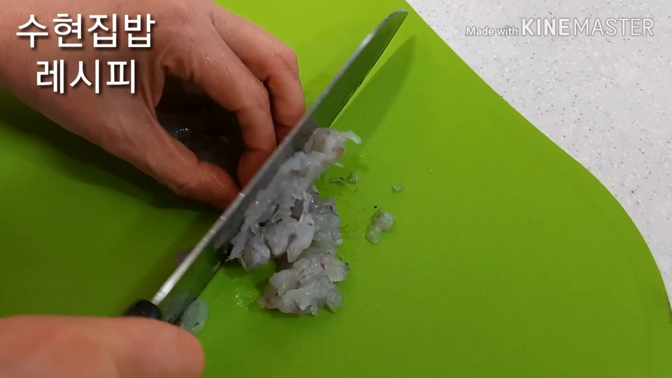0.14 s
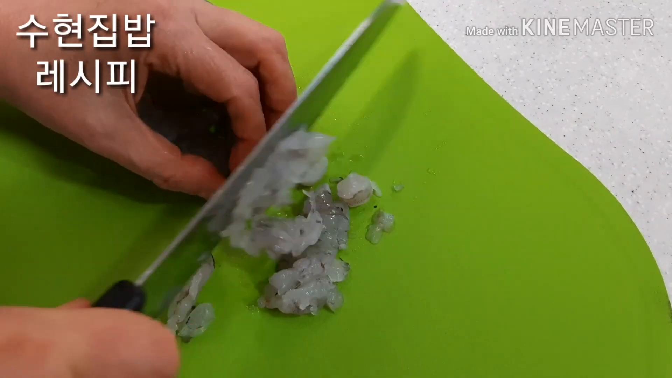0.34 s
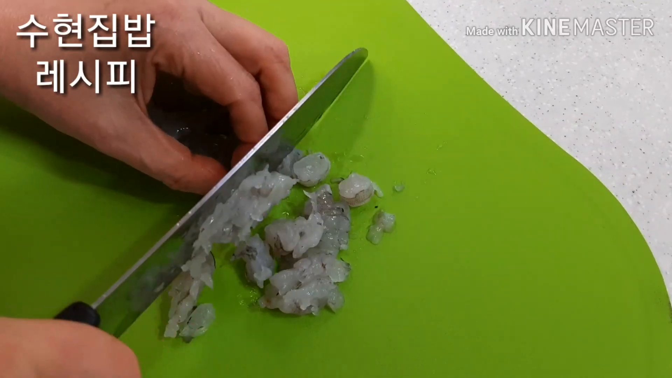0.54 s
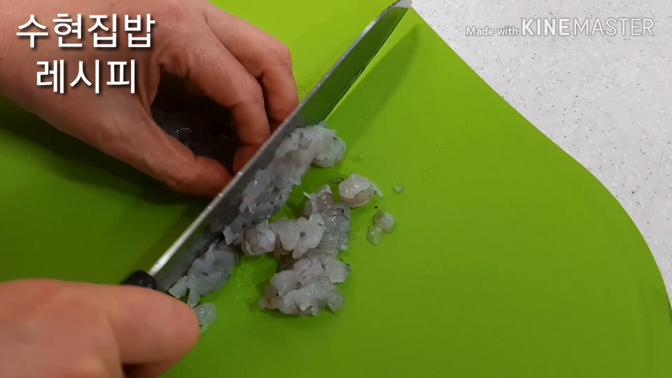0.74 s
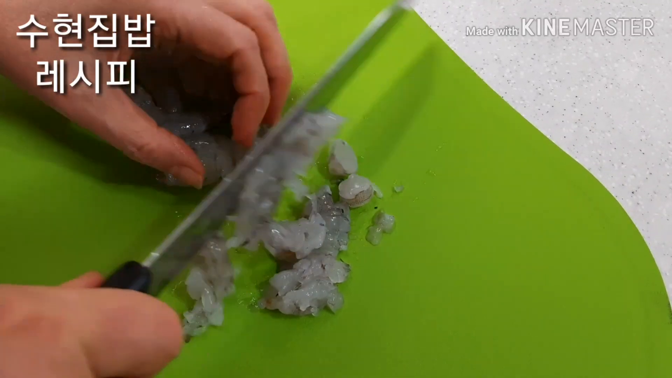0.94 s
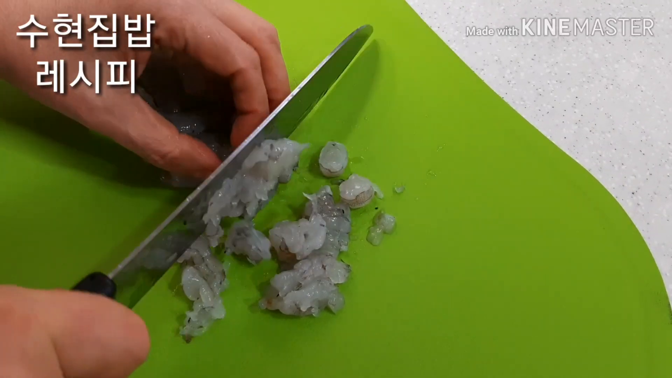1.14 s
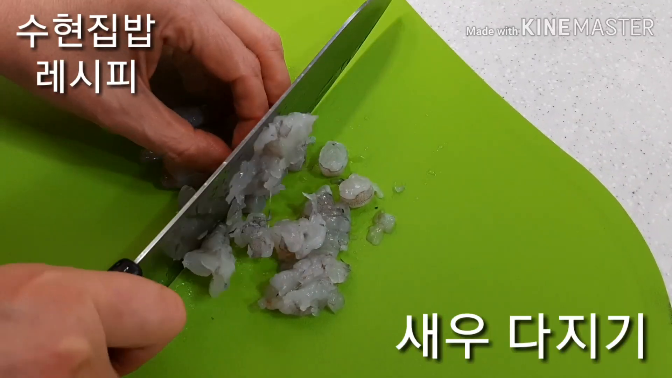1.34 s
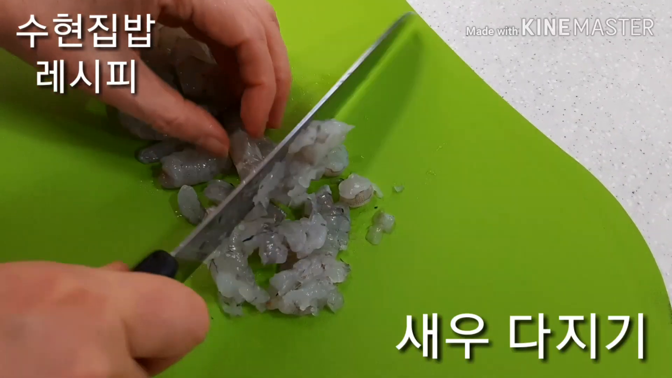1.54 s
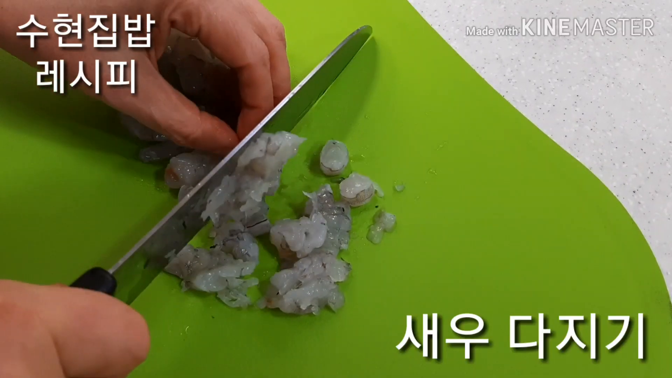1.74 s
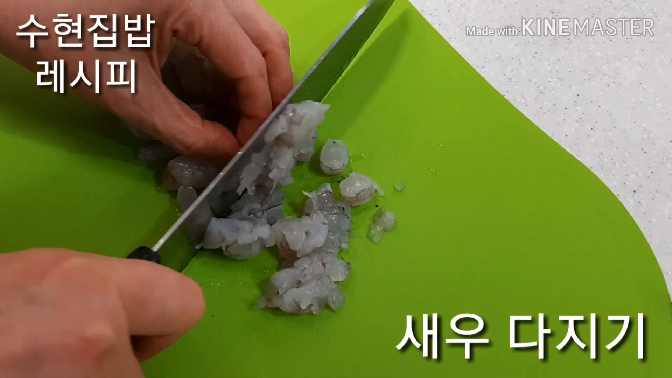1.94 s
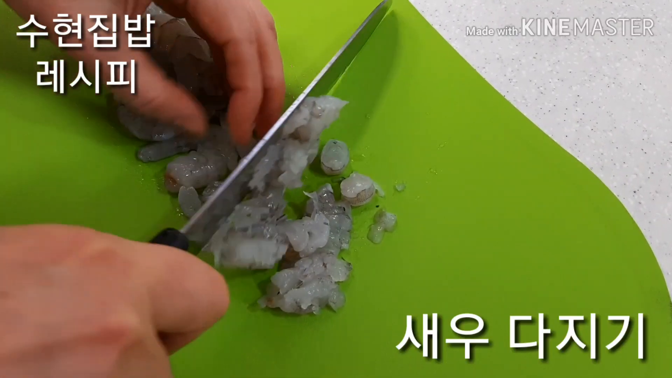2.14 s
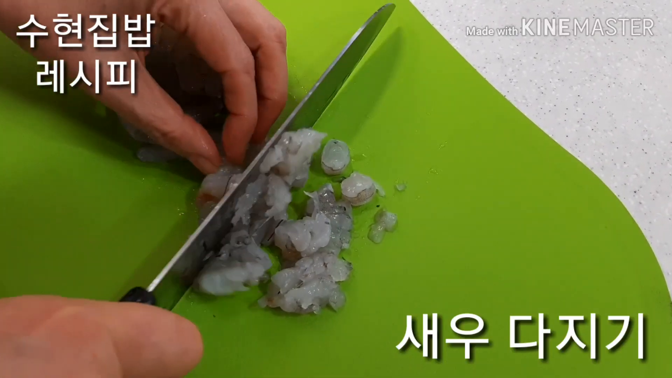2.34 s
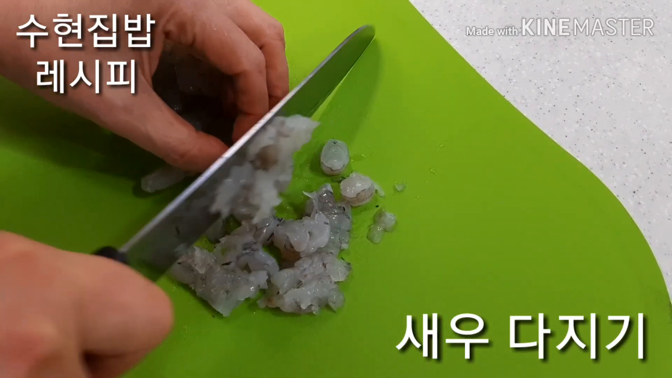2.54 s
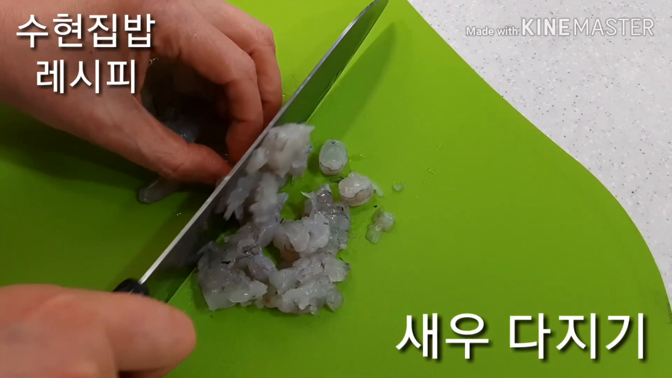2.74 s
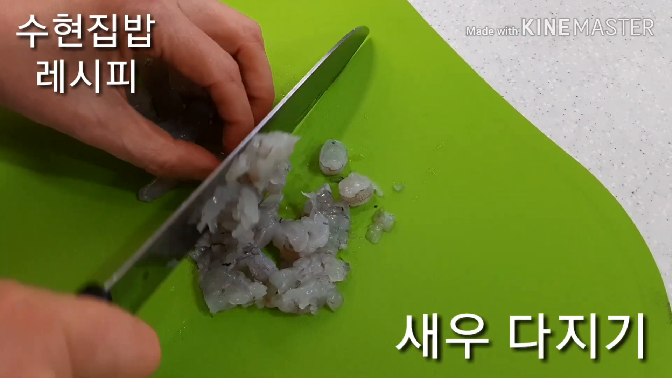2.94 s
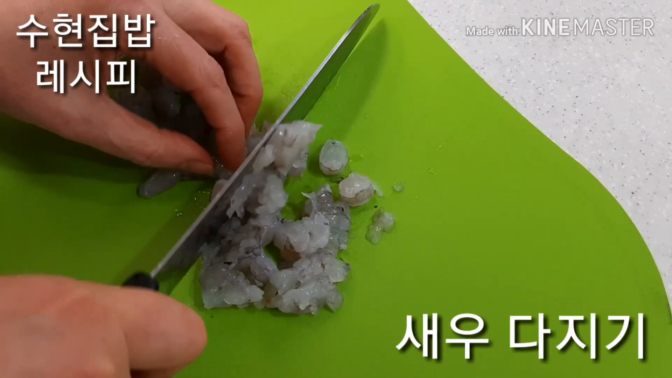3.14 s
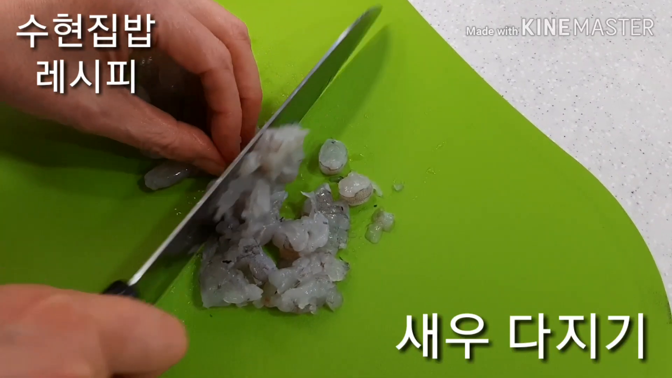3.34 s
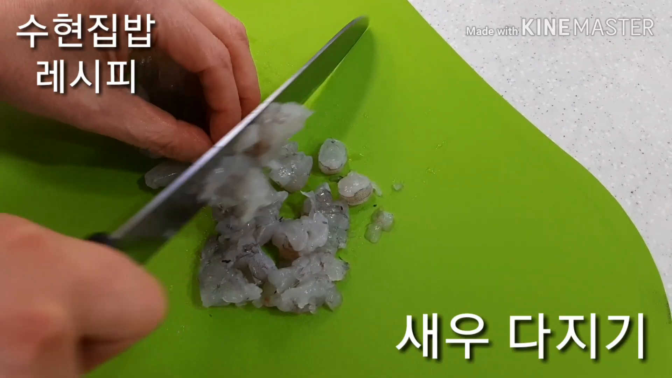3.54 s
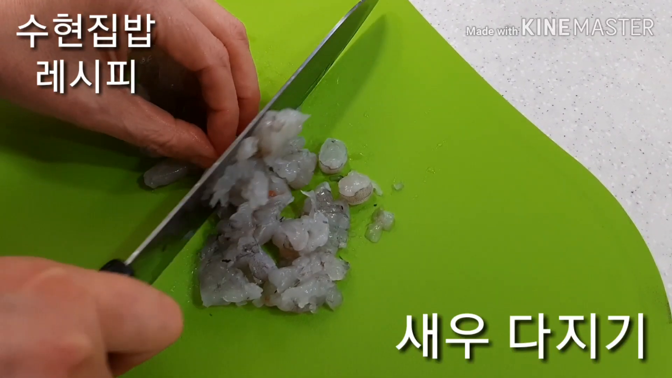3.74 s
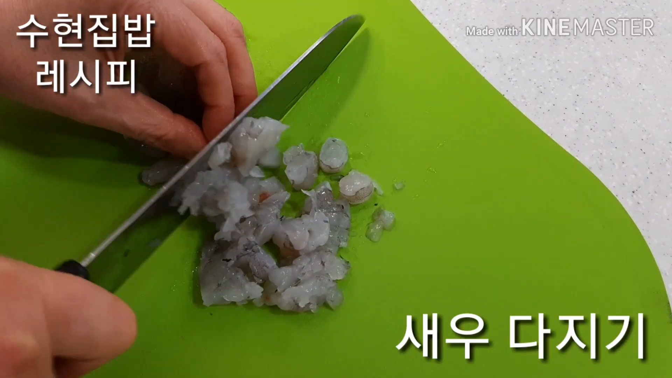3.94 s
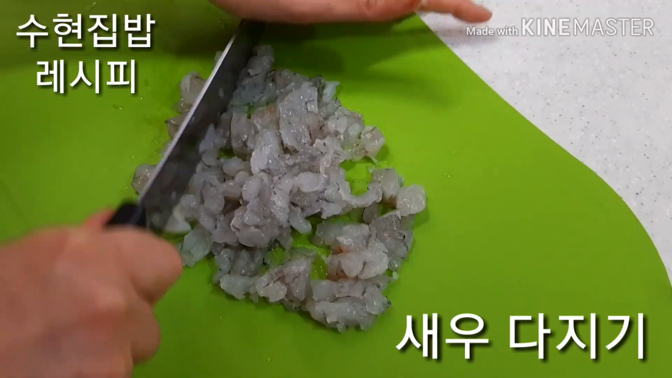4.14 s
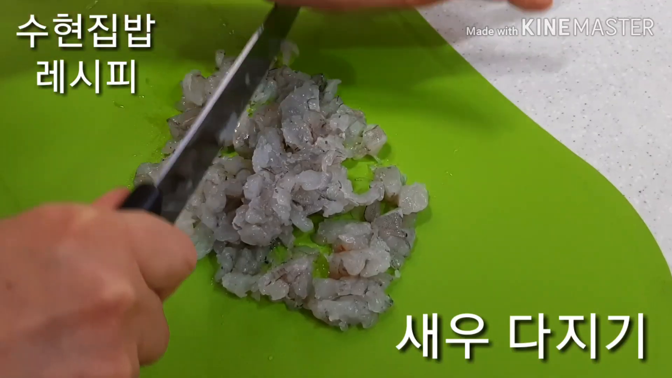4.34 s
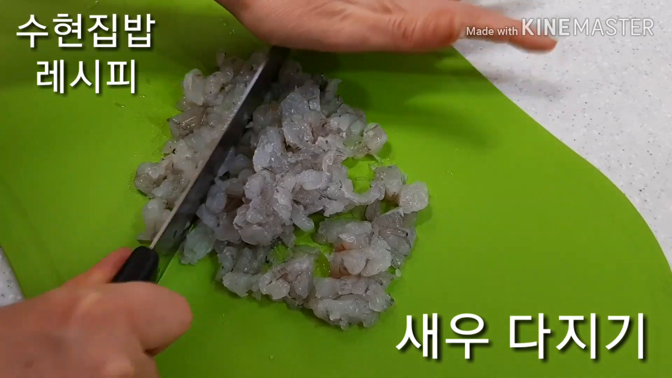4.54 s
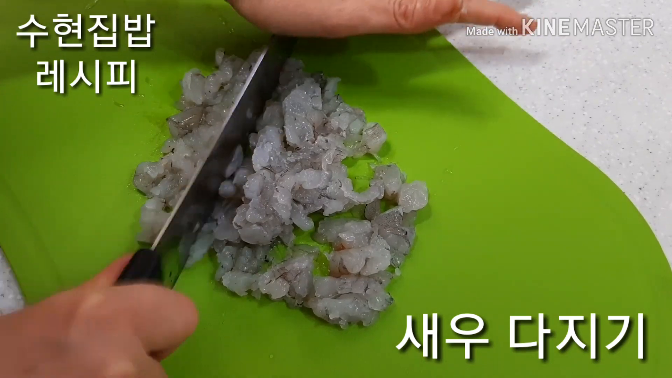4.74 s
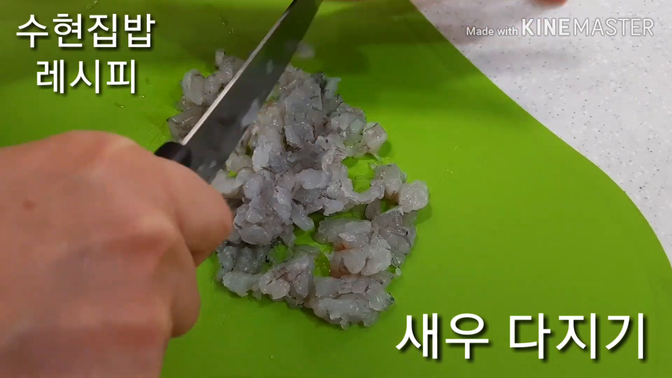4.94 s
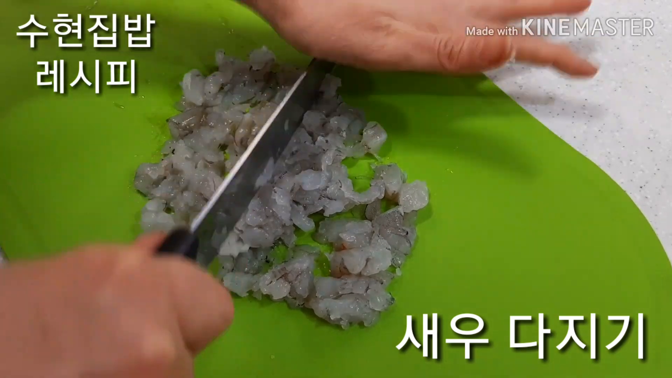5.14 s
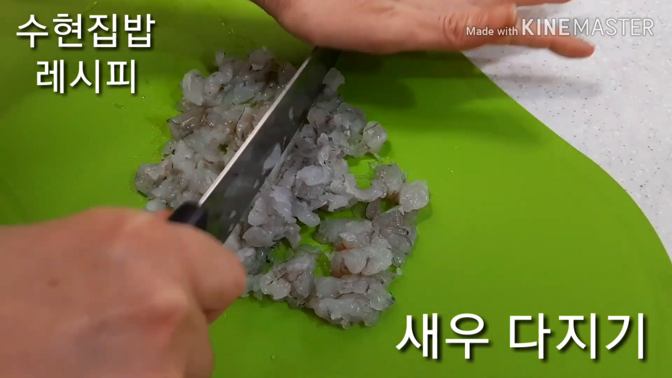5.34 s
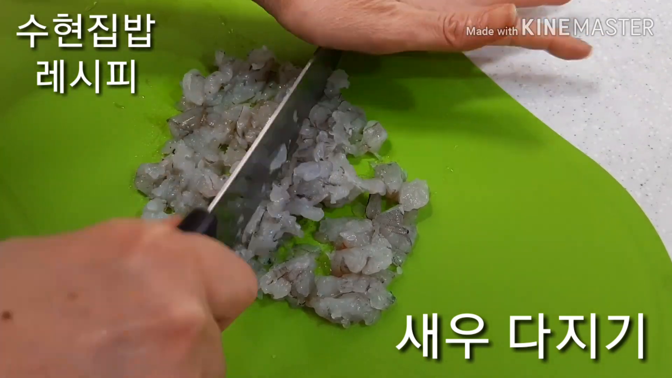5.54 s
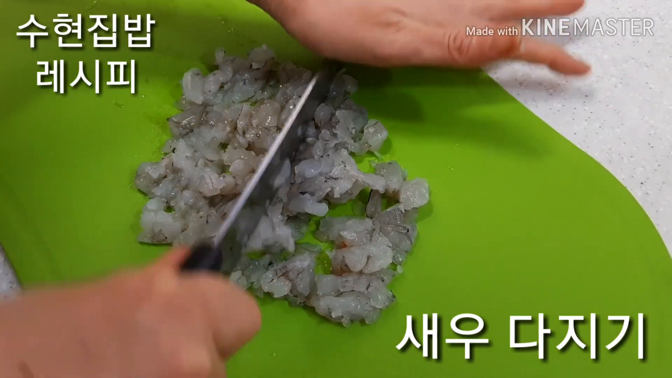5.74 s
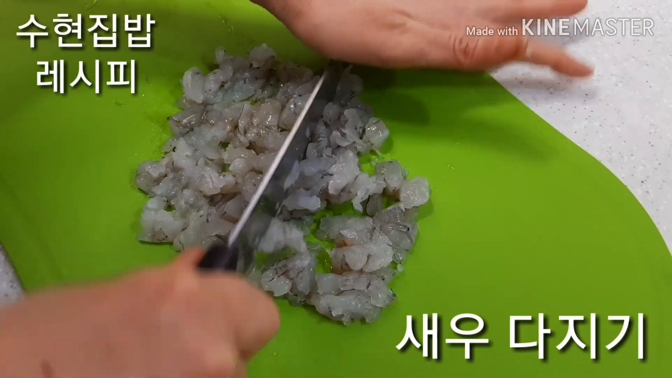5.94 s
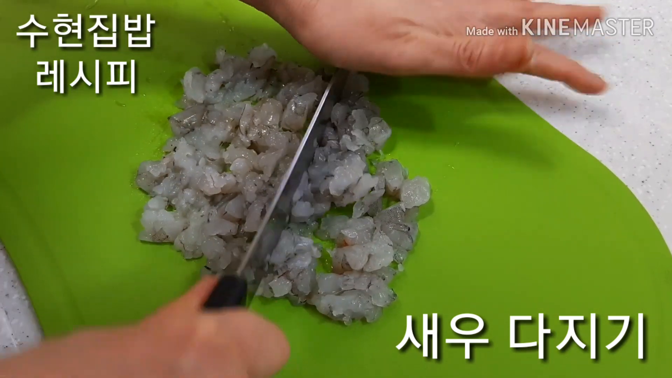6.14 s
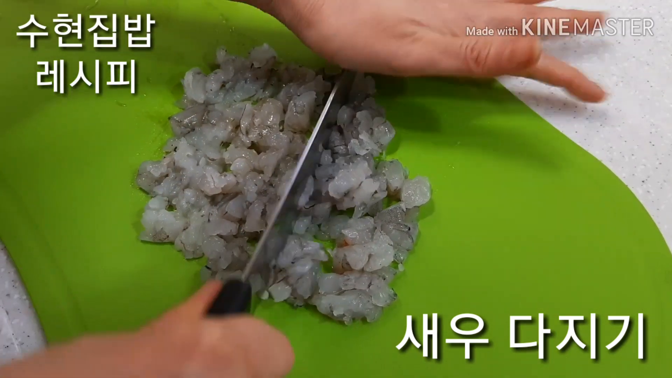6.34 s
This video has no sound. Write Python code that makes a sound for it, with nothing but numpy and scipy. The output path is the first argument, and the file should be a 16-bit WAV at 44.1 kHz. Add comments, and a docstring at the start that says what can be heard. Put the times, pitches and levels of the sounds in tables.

```python
"""A chef's knife minces raw shrimp on a thin plastic board on a counter, close by in a small hard kitchen.
First come ten slow slices: the flesh tears in dense wet crackle and snaps, the edge knocks and grinds
on the board, fingers shuffle the pile, films peel off the rising blade, with squelches and faint squeaks.
From about 4.5 s the strokes turn to quick rocking chops, and board and counter thud harder under
the heel of the knife. A low rumble and hiss lie under it all."""
import sys
import numpy as np
from scipy import signal
from scipy.fft import rfft, irfft
from scipy.io import wavfile
from scipy.ndimage import uniform_filter1d

SR = 44100
rng = np.random.default_rng(int(sys.argv[2]) if len(sys.argv) > 2 else 0)


def unload_audio(sound):
    """Save the sound as a 16-bit wav file, at the path given as the first command line argument."""
    columns = np.transpose(np.atleast_2d(sound))
    # keep every value between -1 and 1, then stretch to whole-number steps
    steps = np.round(np.clip(columns, -1, 1) * 32767)
    wavfile.write(sys.argv[1], SR, steps.astype(np.int16))


N = 281358
TIME = np.arange(N) / SR


def amp(db):
    """Decibels to gain."""
    return 10 ** (np.asarray(db) / 20)


def on_log(points, hz):
    """Read (Hz, value) points along a log-frequency axis."""
    f, value = np.transpose(points)
    return np.interp(np.log(hz + 1e-3), np.log(f), value)


def bins(x):
    """Bin frequencies of x in Hz."""
    return np.arange(x.shape[-1] // 2 + 1) * SR / x.shape[-1]


def unit(x):
    """Scale to unit mean energy per channel."""
    return x / np.sqrt(np.mean(np.sum(x ** 2, axis=-1)))


def ring(x, response):
    """Convolve with an impulse response."""
    return signal.oaconvolve(np.atleast_2d(x), np.atleast_2d(response), axes=-1)[:, :N]


def colour(points, size=4096):
    """Minimum-phase impulse response from (Hz, dB) points."""
    cepstrum = irfft(np.log(amp(on_log(points, bins(np.zeros(size))))))
    cepstrum[1:size // 2] *= 2
    cepstrum[size // 2 + 1:] = 0
    return unit(irfft(np.exp(rfft(cepstrum))))


def lowpass(x, hz, order=2):
    """Butterworth low-pass."""
    return signal.sosfilt(signal.butter(order, min(hz, SR / 2 - 1000), fs=SR, output="sos"), x)


def add(out, start_s, sound):
    """Mix a sound in at start_s."""
    i = max(int(start_s * SR), 0)
    out[..., i:i + sound.shape[-1]] += sound[..., :max(N - i, 0)]


def pan(x, right_db):
    """Favour the right channel."""
    return x * amp(np.array([[-right_db], [right_db]]) / 2)


# Diffuse sound at the two microphone ports. Each row: frequency in Hz, correlation.
PORT_CORRELATION = [(100, 0.91), (250, 0.99), (500, 0.69), (900, 0.43), (2000, -0.3), (16000, -0.096)]


def diffuse(size):
    """White noise at two ports: alike in the bass, nearly unrelated in the treble."""
    noise = rng.standard_normal((2, size))
    mid, side = rfft(noise)
    correlation = np.clip(on_log(PORT_CORRELATION, bins(noise)), -.99, .99)
    shared = mid * np.sqrt((1 + correlation) / 2)
    opposed = side * np.sqrt((1 - correlation) / 2)
    return irfft(np.array([shared + opposed, shared - opposed]), size)


def scatter(x, scatter_db, t60_s, lag_ms):
    """Direct path to both ports, plus quick random echoes off counter, blade and hands."""
    t = TIME[:SR // 12]
    response = amp(scatter_db) * unit(diffuse(len(t)) * 1000 ** (-t / t60_s))
    lag = int(lag_ms * SR / 1000 * rng.uniform(-1, 1))
    response[0, max(lag, 0)] += 1
    response[1, max(-lag, 0)] += 1
    return ring(x, unit(response))


# Each row: frequency in Hz, reverberation T60 in seconds.
KITCHEN_DECAY = [(120, 0.39), (400, 0.33), (1500, 0.36), (5000, 0.35), (9000, 0.24), (15000, 0.24)]


def kitchen(x, wet_db):
    """Add the room's tail, each band dying at its own rate."""
    t = TIME[:SR // 2]
    noise, centres_hz = diffuse(len(t)), np.geomspace(60, 18000, num=12)
    spectrum, tail = rfft(noise), np.zeros_like(noise)
    for hz, weights in zip(centres_hz, np.eye(len(centres_hz))):
        band = on_log(list(zip(centres_hz, weights)), bins(noise))
        tail += irfft(spectrum * band, len(t)) * 1000 ** (-t / on_log(KITCHEN_DECAY, hz))
    onset = np.minimum(t / 0.0032, 1)
    return x + amp(wet_db) * ring(x, unit(tail * onset))


# Each row: frequency in Hz, relative noise density in dB.
ROOM_SPECTRUM = [(15, -31), (25, -34), (70, -6.5), (190, 0.5), (309, -4.5), (344, -4.5), (545, -19.5),
                 (818, -20.5), (988, -15.5), (1130, -23), (1520, -24.5), (2690, -28.5), (10100, -32),
                 (14800, -30.5), (16000, -49)]


def room_tone(level_db=-67.5):
    """Low, steady rumble under a smooth hiss."""
    return amp(level_db) * ring(diffuse(N), colour(ROOM_SPECTRUM))


EASE_S, EASE_DB = 0.022, 30.5


def contact(length_s, db, swell_db, t60_s):
    """Gain of one contact: easing in for EASE_S before it bites, a steady swell or fade, a release."""
    t = TIME[:int(min(EASE_S + length_s + t60_s, .4) * SR)] - EASE_S
    ramp_db = swell_db * (np.clip(t / length_s, 0, 1) - .5)
    onset_db = EASE_DB * np.minimum(t / EASE_S, 0)
    release = 1000 ** (-np.maximum(t - length_s, 0) / t60_s)
    return amp(db + ramp_db + onset_db) * release


def grains(gain, per_s, spread_db, clump_db, clump_hz):
    """Tiny random ruptures of uneven size, coming in clumps under a gain curve."""
    n = len(gain)
    chance, size, sign, clump = rng.random((4, SR // 2))[:, :n]
    strength = amp(-spread_db * np.log(size + 0.062))
    clumping = amp(clump_db * np.interp(TIME[:n] * clump_hz, np.arange(n), 2 * clump - 1))
    clicks = (chance < per_s / SR) * np.sign(sign - .5) * strength * clumping
    local_power = np.abs(uniform_filter1d(clicks ** 2, size=1100))
    return gain * clicks / np.sqrt(local_power + 1e-3)


def spray(clicks, spray_db, t60_s):
    """Each rupture throws a short burst of finer crackle, different at the two ports."""
    decay = unit(1000 ** (-TIME[:SR // 20] / t60_s))
    power = ring(clicks ** 2, decay ** 2)
    bursts = np.sqrt(np.abs(power)) * rng.standard_normal((2, SR // 2))[:, :power.shape[1]]
    out = amp(spray_db) * bursts
    add(out, 0, clicks)
    return out / np.hypot(1, amp(spray_db))


# Each row: frequency in Hz, relative level in dB, T60 in seconds, signed gain at the microphone.
BOARD_MODES = [(92.2, -3.5, 0.059, -0.66), (150.3, 1.5, 0.25, 1), (197, -6.5, 0.09, 0.63),
               (200.1, -4, 0.14, 1), (276.3, -3, 0.13, -1.32), (345.2, -7.5, 0.19, 0.27),
               (357.2, 4.5, 0.3, -0.35), (396, -9.5, 0.23, 0.96), (455.6, -8, 0.59, 0.36),
               (572, 2, 0.15, -0.87), (645, -28, 0.14, -0.044), (703, -19.5, 0.72, -0.7),
               (910, -19.5, 0.46, 0.45), (1015, -4, 0.16, -0.95), (1445, -17, 0.1, 1),
               (1500, -30, 0.15, -1.1), (1600, -16, 0.11, 0.77), (2064, -3.5, 0.041, -1.9)]


def board():
    """Board and counter answer a tap with decaying modes."""
    t = TIME[:SR // 3]
    return sum(gain * amp(db) * np.sin(2 * np.pi * hz * t) * 1000 ** (-t / t60_s)
               for hz, db, t60_s, gain in BOARD_MODES)


def light_touch(spectrum, modes_db, highpass_hz):
    """Response to a contact with no weight behind it: a broad knock plus the board's upper modes."""
    upper_modes = signal.sosfilt(signal.butter(3, highpass_hz, "high", fs=SR, output="sos"), board())
    response = amp(modes_db) * unit(upper_modes)
    add(response, 0, colour(spectrum))
    return unit(response)


# Each row: frequency in Hz, relative density in dB.
CRACKLE_SPECTRUM = [(500, -18.5), (1500, -22), (3000, -7.5), (5000, -5), (7200, -5), (8500, 3.5),
                    (10000, -1), (12500, 3), (15000, -4.5), (16500, -7.5)]
GRIND_SPECTRUM = [(70, -15.5), (120, -5), (165, -11.5), (210, 12.5), (280, -20.5), (360, 8), (500, -3),
                  (650, 0.5), (900, -6.5), (1500, -14), (3000, -14.5), (6000, -17.5), (16000, -27)]
# Downstrokes through the flesh. Each row: start and length in seconds, then crackle level,
# swell over the stroke, grind level and later rubbing level in relative dB.
STROKES = [ (0.045, 0.094, -53.5, 9, -47.5, -72), (0.662, 0.097, -56, 15.5, -49, -66),
           (1.316, 0.083, -58.5, -1.5, -49, -56.5), (1.923, 0.071, -56, -5, -47.5, -68),
           (2.356, 0.036, -65, 6, -62, -64), (2.704, 0.094, -58.5, -2.5, -50.5, -60.5),
           (3.045, 0.065, -65.5, -2, -59, -64.5), (3.38, 0.05, -53.5, 1, -41.5, -59),
           (3.694, 0.068, -57, -9.5, -44.5, -64), (4.034, 0.08, -58, -11, -48, -69.5),
           (4.551, 0.021, -50, 10, -40.5, -63), (4.803, 0.013, -46, 12.5, -42, -81),
           (5.252, 0.021, -45.5, -0.5, -40.5, -74), (5.474, 0.021, -50, 13, -47, -78),
           (5.695, 0.021, -44.5, 5.5, -44, -68), (5.904, .026, -48, 6.5, -40.5, -60),
           (6.113, 0.017, -46, 14, -42, -67), (6.323, 0.016, -50, 9.5, -45, -70)]


def cutting():
    """Fibres tear under the edge: bright crackle in the air, dull grinding through the board."""
    crackle, grind = np.zeros((2, 2, N))
    for start_s, length_s, crackle_db, swell_db, grind_db, _ in STROKES:
        grind_swell_db = 0.89 * swell_db + 7.5  # grows as the edge nears the board
        tear_gain = contact(length_s, crackle_db, swell_db, t60_s=0.018)
        drag_gain = contact(length_s, grind_db, grind_swell_db, t60_s=0.038)
        tearing = grains(tear_gain, per_s=2500, spread_db=4, clump_db=7, clump_hz=160)
        dragging = grains(drag_gain, per_s=1300, spread_db=5, clump_db=7.5, clump_hz=134.4)
        add(crackle, start_s - EASE_S, spray(tearing, spray_db=11.5, t60_s=0.0084))
        add(grind, start_s - EASE_S, scatter(dragging, scatter_db=-1.5, t60_s=0.052, lag_ms=0.41))
    crackle = ring(crackle, colour(CRACKLE_SPECTRUM))
    grind = ring(grind, light_touch(GRIND_SPECTRUM, modes_db=-14.5, highpass_hz=470))
    return amp(3.5) * kitchen(crackle, wet_db=-9), amp(-1.5) * kitchen(grind, wet_db=-8)


def settling(window_s=0.087, db=-47, spread_db=3, hz=10500, spread_hz=2500):
    """The flesh settles after each stroke: one faint random snap each, as rows like WET_SNAPS."""
    rows = []
    for start_s, length_s, *_ in STROKES:
        when, size, pitch = rng.random(3)
        snap_s = start_s + length_s + window_s * when
        rows.append((snap_s, db + spread_db * (2 * size - 1), hz + spread_hz * (2 * pitch - 1)))
    return rows


# Each row: frequency in Hz, relative density in dB.
SNAP_SPECTRUM = [(400, -4), (2000, -13), (4000, -13.5), (7000, -5), (8600, 0), (12500, 1), (16000, -3)]
# Each row: start in seconds, relative level in dB, ping pitch in Hz.
WET_SNAPS = [(0.043, -34, 8600), (0.0707, -27.5, 9500), (0.131, -30, 14100), (0.737, -32, 8440),
             (0.8794, -55, 8700), (0.9171, -34, 4180), (0.965, -44, 8470), (1.3125, -34.5, 8400),
             (1.4024, -32, 8700), (1.553, -32.5, 8000), (2.0897, -35.5, 11600), (2.198, -49, 9100),
             (2.4982, -43.5, 13500), (2.7006, -26, 8600), (2.7546, -38, 8600), (2.832, -37.5, 15000),
             (3.0356, -37, 8500), (3.1656, -50, 10300), (3.3737, -26.5, 8360), (3.4906, -41, 4970),
             (3.8013, -40.5, 9300), (4.011, -42.5, 9400), (4.55, -33.5, 9770), (4.569, -35, 11300),
             (4.661, -46, 12600), (4.9563, -43.5, 8340), (5.218, -38, 9000), (5.238, -25.5, 8640),
             (5.3282, -33, 10500), (5.5463, -31, 13200), (5.698, -32, 14500), (5.771, -30, 13100),
             (5.877, -42.5, 11600), (5.9567, -24.5, 11900), (5.9818, -31, 11000), (6.1127, -31, 9900),
             (6.1559, -31, 8600), (6.364, -22.5, 11600)]


def snaps(burst_t60_s=0.008, ping_db=-7, ping_t60_s=0.003):
    """A fibre or film snaps: milliseconds of crackle with the ping of a tiny air pocket."""
    out, t = np.zeros((2, N)), TIME[:SR // 30]
    for start_s, db, hz in list(WET_SNAPS) + settling():
        burst = unit(rng.standard_normal(len(t)) * 1000 ** (-t / burst_t60_s))
        ping = unit(np.sin(2 * np.pi * hz * t) * 1000 ** (-t / ping_t60_s))
        snap = scatter(burst + amp(ping_db) * ping, scatter_db=-2.5, t60_s=0.044, lag_ms=0.27)
        add(out, start_s, amp(db) * unit(snap))
    return amp(9) * kitchen(ring(out, colour(SNAP_SPECTRUM)), wet_db=-7)


# Each row: delay in ms, bass gain.
WALL_ECHOES = [(9.5, 1.38), (26.2, 0.58), (35.5, 0.15)]
# The blade landing on the board. Each row: start in seconds, relative thud level in dB,
# push length in ms, relative clack level in dB, clack cutoff in Hz.
LANDINGS = [ (0.045, -43.5, 4, -44.5, 2500), (0.087, -47, 2, -39, 1500), (0.129, -58, 5.2, -41, 2500),
            (0.625, -51, 5.8, -66, 500), (0.736, -54, 4.2, -46.5, 2000), (1.233, -45.5, 6, -55.5, 700),
            (1.312, -46, 5.1, -39, 1170), (1.777, -43.5, 1.6, -33, 840), (1.929, -52, 5.3, -44.5, 900),
            (2.363, -47.5, 5.7, -48, 890), (2.699, -51.5, 3, -45.5, 1560), (3.072, -58.5, 2.6, -48, 503),
            (3.375, -43.5, 2.9, -37, 690), (3.419, -72, 1.7, -44.5, 2000), (3.696, -55, 2.7, -51, 500),
            (4.459, -41.5, 1.7, -23, 1570), (4.571, -34, 4.4, -54, 2500), (4.815, -32.5, 6.2, -47, 2500),
            (5.192, -40.5, 2.6, -25, 1500), (5.238, -63, 1.5, -39, 1500), (5.273, -35, 11, -53, 2500),
            (5.4919, -28.5, 4.64, -39, 2020), (5.711, -32, 7.04, -39.5, 2580), (5.919, -26, 5, -34.5, 3500),
            (6.129, -29, 3.7, -34.5, 3500), (6.339, -25, 6.3, -35.5, 3500)]


def thuds():
    """Each landing pushes the board's modes; a long soft push wakes only the lowest."""
    force, t = np.zeros(N), TIME[:SR // 50]
    for start_s, thud_db, push_ms, _, _ in LANDINGS:
        push = np.sin(np.pi * np.minimum(t * 1000 / push_ms, 1)) ** 2
        add(force, start_s, amp(thud_db) * push / push.sum())
    out = ring(force, board())[0]
    # the walls return the bass whole and scatter the rest
    bass = lowpass(lowpass(out, hz=496)[::-1], hz=630)[::-1]
    for delay_ms, gain in WALL_ECHOES:
        add(out, delay_ms / 1000, gain * bass)
    return kitchen(out, wet_db=-12)


# Each row: frequency in Hz, relative density in dB.
CLACK_SPECTRUM = [(100, -33), (220, -14.5), (320, 1.5), (440, -3), (700, -6), (1100, -16.5), (1350, -13.5),
                  (2300, -16), (4000, -10), (8500, -15.5), (16000, -13)]


def clacks(contact_ms=0.59, peak_db=-7):
    """The edge beds into the board and slaps it on the counter; a cushioned slap is duller."""
    out = np.zeros((2, N))
    body = light_touch(CLACK_SPECTRUM, modes_db=-11.5, highpass_hz=282)
    push = np.sin(np.pi * np.minimum(TIME[:SR // 100] * 1000 / contact_ms, 1)) ** 2
    hard_peak = amp(peak_db) * (push == push.max())  # steel meets plastic
    force = push / push.sum() + hard_peak
    for start_s, _, _, clack_db, cutoff_hz in LANDINGS:
        knock = ring(lowpass(body, cutoff_hz, order=1), force)
        clack = scatter(knock, scatter_db=3.5, t60_s=0.064, lag_ms=0.32)
        add(out, start_s, amp(clack_db) * unit(clack))
    return amp(21.5) * kitchen(out, wet_db=-2)


# Each row: frequency in Hz, relative density in dB.
RUB_SPECTRUM = [(50, -33), (110, 3), (210, -1.5), (380, 3), (600, -11), (1000, -20.5), (2000, -32),
                (5000, -26), (16000, -25)]


def shuffling(delay_s=0.009, length_s=0.37):
    """Fingers and flesh rub softly on the board, swelling after each stroke and never quite stopping."""
    gain = np.full(N, amp(-79.5))
    swell = np.sin(np.linspace(0, np.pi, int(length_s * SR)))
    for start_s, *_, rub_db in STROKES:
        add(gain, start_s + delay_s, amp(rub_db) * swell)
    return amp(-6) * ring(diffuse(N) * gain, colour(RUB_SPECTRUM))


# Each row: frequency in Hz, relative density in dB.
PEEL_SPECTRUM = [(300, -0.5), (1000, -1), (2500, -12), (3600, -4.5), (6000, -1), (8600, -1.5),
                 (12000, -1.5), (16000, -8.5)]
# Each row: start in seconds, length in seconds, relative level in dB, swell in dB.
FILM_PEELS = [ (0.23, 0.02, -53, 3), (0.289, 0.012, -52.5, 5.5), (0.843, 0.036, -57, -4),
              (0.902, 0.0097, -50, 2), (1.499, 0.03, -59.5, -8), (1.54, 0.026, -52.5, 5),
              (2.074, 0.035, -62, 0), (2.438, 0.037, -61.5, 7), (3.489, 0.055, -67, -8),
              (4.151, 0.041, -66.5, 0), (4.245, 0.062, -69, -9), (4.858, 0.065, -64, 2),
              (5.317, 0.058, -56.5, -1), (5.53, 0.041, -59, 7), (5.743, 0.063, -56.5, -4),
              (5.945, 0.05, -54, -5), (6.153, 0.048, -53.5, 2)]


def peeling():
    """Sticky films of flesh break in a thin, sparse crackle as the blade rises."""
    out = np.zeros((2, N))
    for start_s, length_s, db, swell_db in FILM_PEELS:
        gain = contact(length_s, db, swell_db, t60_s=0.028)
        films = grains(gain, per_s=1400, spread_db=4, clump_db=5, clump_hz=150)
        add(out, start_s - EASE_S, spray(films, spray_db=9, t60_s=0.05))
    return amp(-2.5) * kitchen(ring(out, colour(PEEL_SPECTRUM)), wet_db=-8.5)


# Each row: start in seconds, relative level in dB, pitch in Hz, length in seconds.
WET_SQUEAKS = [(0.907, -52.5, 4230, .016), (2.585, -72.5, 1490, 0.091), (3.423, -52, 3400, 0.024),
               (3.487, -53, 4880, 0.012), (3.618, -72, 2210, 0.064), (4.825, -51.5, 3050, 0.055),
               (5.277, -52, 2770, 0.014), (5.923, -41.5, 1990, 0.015), (5.946, -48, 3630, 0.015),
               (6.152, -50, 3360, 0.028), (6.367, -41, 2040, 0.012)]


def squelches(wobble=0.09, wobble_hz=900, glide=0.06):
    """Short wet squelches and faint longer squeaks, their pitch unsteady and rising."""
    out = np.zeros((2, N))
    for start_s, db, hz, length_s in WET_SQUEAKS:
        progress = np.linspace(0, 1, int(length_s * SR))
        jitter = np.interp(TIME[:len(progress)] * wobble_hz, np.arange(200), rng.standard_normal(200))
        pitch_hz = hz * (1 + glide * (progress - .5) + wobble * jitter)
        phase = 2 * np.pi * np.cumsum(pitch_hz) / SR
        squeak = amp(db) * np.sin(np.pi * progress) * np.sin(phase)
        add(out, start_s, scatter(squeak, scatter_db=8, t60_s=0.015, lag_ms=0.2))
    return kitchen(out, wet_db=-10)


def scene():
    """Crackle, peels, snaps and thuds sit to the right; the rest is centred."""
    crackle, grind = cutting()
    wet = pan(crackle, right_db=3.5) + pan(peeling(), right_db=4) + pan(snaps(), right_db=4.5)
    return wet + squelches() + pan(thuds(), right_db=2.5) + grind + clacks() + shuffling() + room_tone()


def record(dry):
    """The phone cuts the treble above 15.7 kHz."""
    return signal.sosfilt(signal.ellip(10, .2, 80, 15700, fs=SR, output="sos"), dry)


dry = scene()
out = record(dry)
unload_audio(out)
```